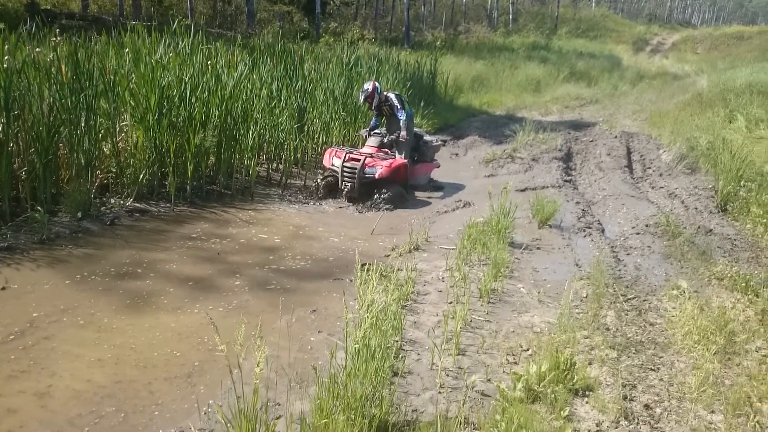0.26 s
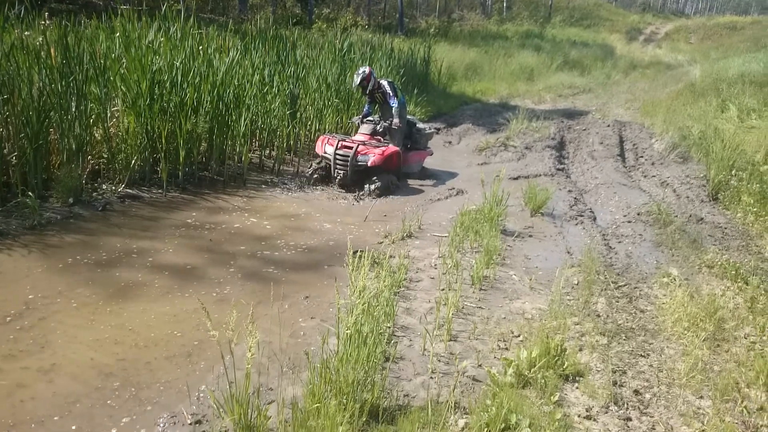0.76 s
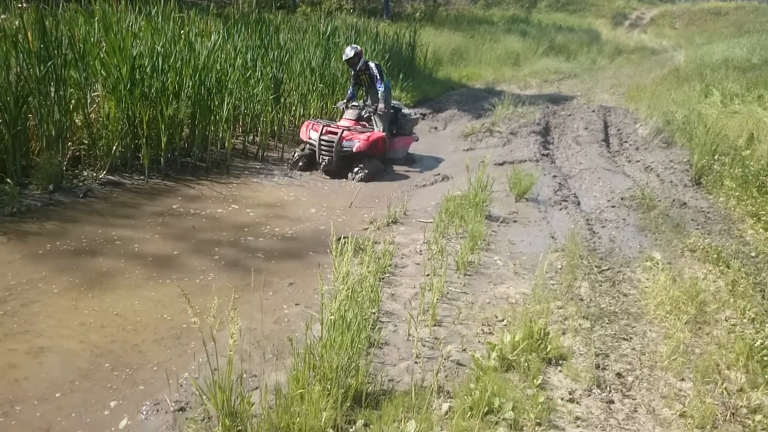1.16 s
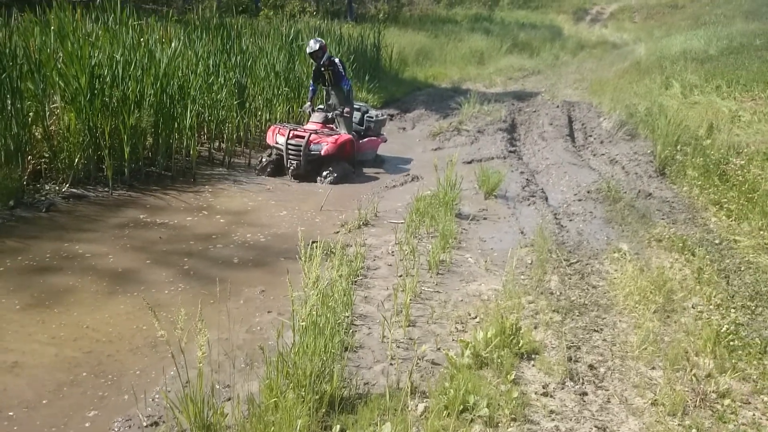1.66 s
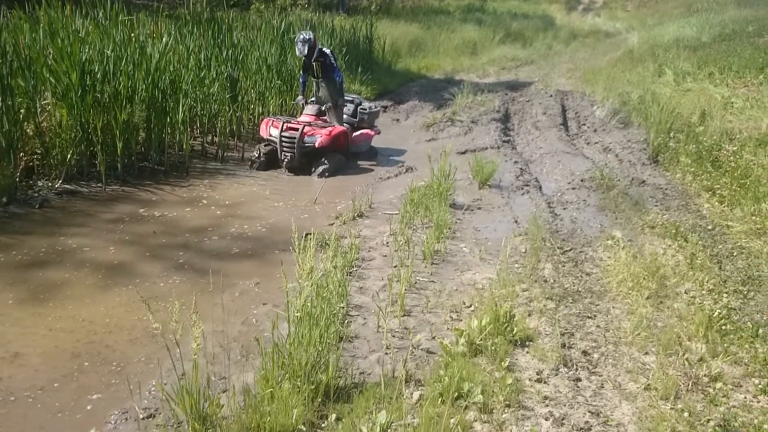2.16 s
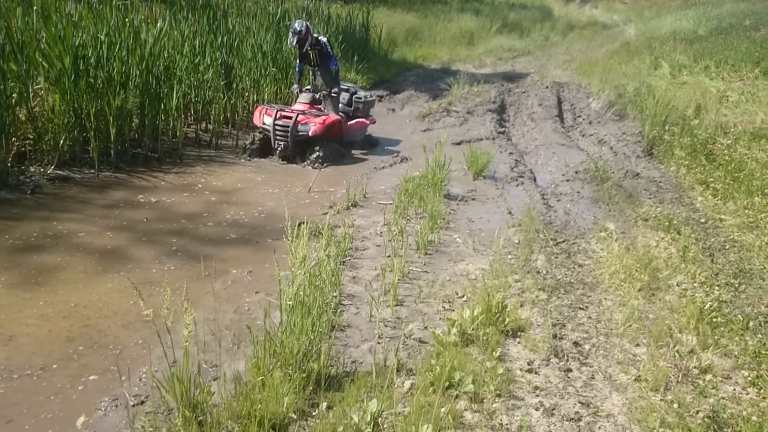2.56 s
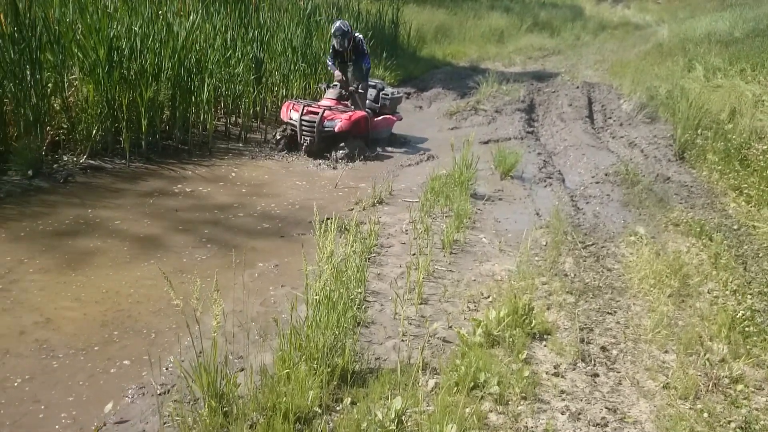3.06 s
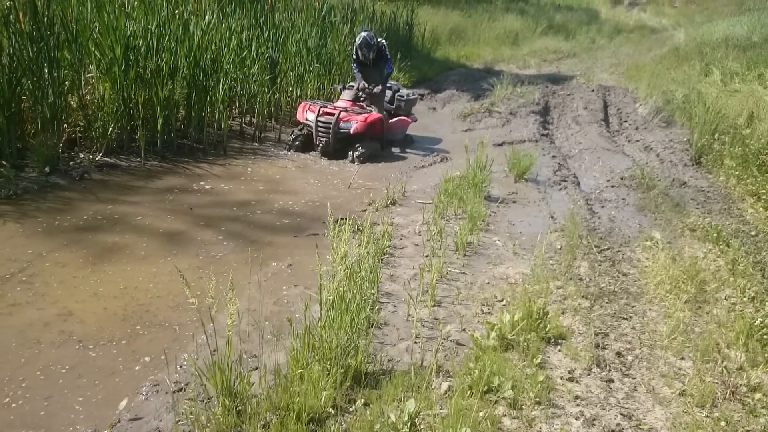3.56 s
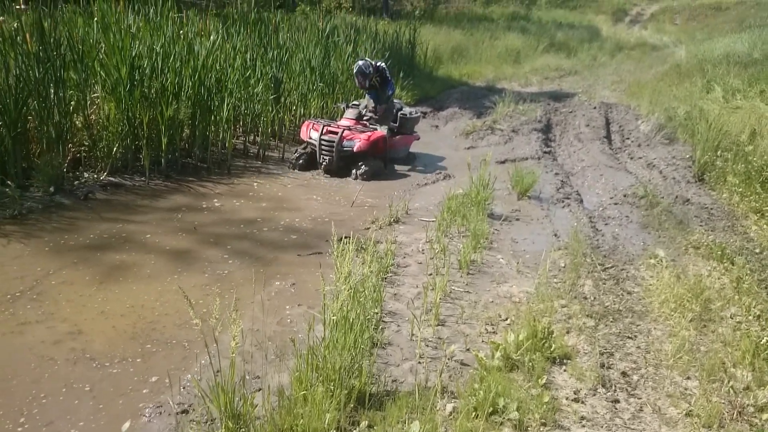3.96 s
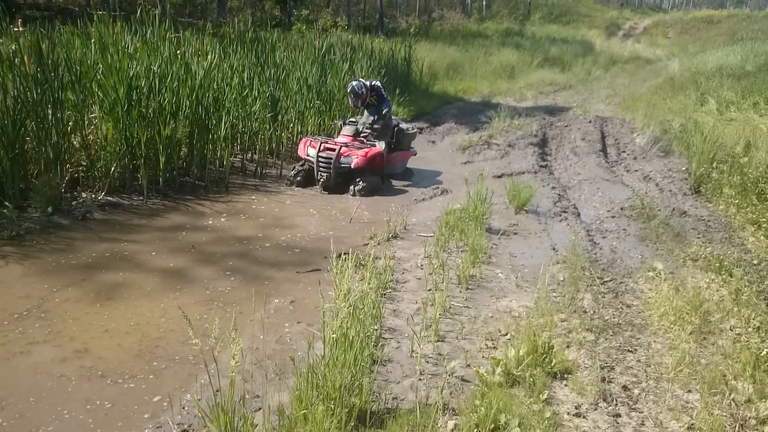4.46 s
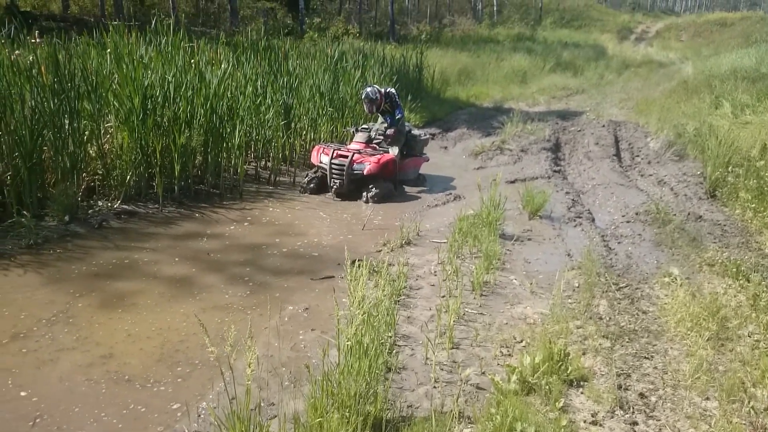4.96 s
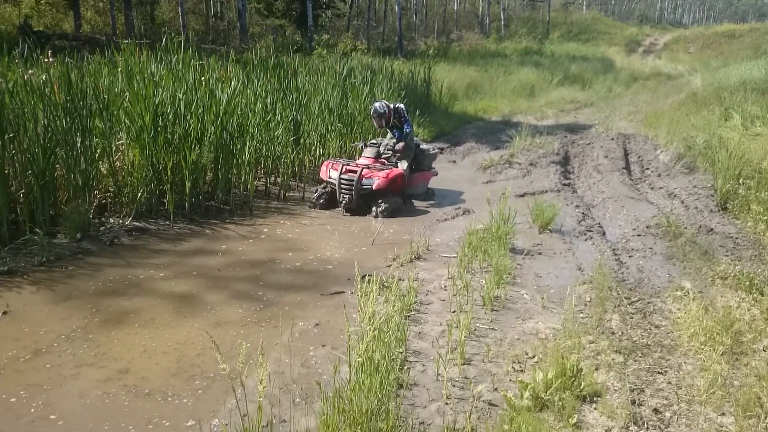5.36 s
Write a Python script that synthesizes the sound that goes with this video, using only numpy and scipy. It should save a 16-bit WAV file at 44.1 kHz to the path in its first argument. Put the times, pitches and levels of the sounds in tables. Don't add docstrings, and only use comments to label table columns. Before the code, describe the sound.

Starts mid-rev: raspy exhaust thuds and dense hissing wheelspin, then mud plops as the engine slackens. It labours back up, bursts at full throttle around two and a half seconds, spatters and drops to slow soft thumps. Nearby, a low twin engine putters evenly; open marsh air, faint ripples, stereo pair slightly stronger on the right.

```python
import sys
import numpy as np
from scipy import signal
from scipy.fft import rfft, irfft, next_fast_len
from scipy.io import wavfile
from scipy.ndimage import uniform_filter1d

SR = 44100
rng = np.random.default_rng(int(sys.argv[2]) if len(sys.argv) > 2 else 0)


def transcribe(u):
    v = np.clip(np.atleast_2d(u).T, -1, 1)
    q = np.round(v * 32767).astype(np.int16)
    wavfile.write(sys.argv[1], SR, q)


def undo_db(level):
    steps = np.asarray(level, float) / 20
    return 10 ** steps


N = 246959
TIME = np.arange(N) / SR

# (time [s], speed [firings/s])
SPEED = [(0.0, 22.06), (0.38, 24.49), (0.71, 15.96), (0.96, 14.01), (1.16, 16.86), (1.49, 17.56),
         (1.71, 19.28), (2.13, 19.08), (2.52, 23.37), (2.62, 28.15), (2.75, 25.82), (2.88, 14.98),
         (3.1, 11.29), (3.45, 9.93), (3.53, 10.32), (4.44, 10.79), (5.42, 10.88), (5.6, 12.89)]
# (time [s], opening [0 shut - 1 wide])
THROTTLE = [(0, .35), (.4, .38), (.55, .15), (1, .1), (1.3, .18), (2.13, .16), (2.25, .4), (2.45, .65),
            (2.6, 1), (2.7, .9), (2.8, .2), (3.1, 0), (5.6, 0)]
# (time [s], level of the gas puffs [dB])
CHARGE = [(0, -32.5), (.3, -31.5), (.6, -38), (.9, -43), (1.3, -38.5), (1.6, -35.5), (2, -34.5),
          (2.15, -36.5), (2.25, -28.5), (2.6, -26), (2.78, -35), (2.9, -46.5), (3.2, -48), (3.6, -47),
          (4.2, -49.5), (4.55, -44.5), (5.6, -46)]
# (frequency [Hz], level when shut [dB], gain wide open [dB], t60 [s])
PIPE = [
    (106, 0, 0, .14),
    (130, -22, 22, .12),
    (46, -9.5, 4, .13),
]
# (frequency [Hz], density [dB/Hz])
BARK = [(240, -35), (400, -3.5), (633, -2.5), (809, -5.5), (929, -5.5), (1020, -8), (1120, -3.5),
        (1640, -7), (1970, -0.5), (2550, -3), (2890, -6.5), (5410, 0), (8560, -20), (15600, -27.5)]
# (frequency [Hz], density [dB/Hz])
IDLE_BARK = [(290, -37), (500, -8), (620, -8), (804, -15.5), (1140, -13), (1470, -19.5), (2330, -8),
             (3110, -16.5), (5370, -12.5), (7580, -33.5), (15600, -47)]
# (frequency [Hz], density [dB/Hz])
JET = [(4000, -40), (7500, 3), (11000, -13.5), (15600, -10)]
# (delay after firing [turns], frequency [Hz], level [dB], t60 [s])
TAPPETS = [
    (-.17, 6100, -48, .02),
    (.1, 2350, -50, .06),
    (.3, 5350, -55, .05),
]

# (time [s], speed [cycles/s])
TWIN_SPEED = [(0.0, 9.679), (0.7, 9.216), (1.4, 9.347), (2.1, 9.347), (2.8, 9.446), (3.5, 9.33),
              (4.2, 9.305), (4.9, 9.482), (5.6, 9.368)]
# (place in the cycle [0-1], level [dB])
TWIN_FIRE = [
    (.103, -2),
    (.465, 0),
]
# (frequency [Hz], level [dB], t60 [s], phase lead [turns])
TWIN_PIPE = [
    (52, -23.3, .18, .07),
    (105.5, -23, .12, .47),
    (240, -28.5, .08, .2),
]

# (full spray at [s], held [s], spray [dB], churn [dB], dying [dB/s])
SPINS = [
    (-.13, 0.93, -31, -33.5, 51),
    (2.55, 0.6, -31.5, -38, 87),
]
# (time [s], level [dB])
SHOWERS = [
    (3.033, -30.5),
    (3.095, -39.5),
    (3.244, -41.5),
]
# (frequency [Hz], density [dB/Hz])
SPRAY = [(590, -29), (1000, -19.5), (1300, -14.5), (1680, -7), (2390, -5.5), (2750, -4), (4400, -6),
         (5350, 2), (6000, -3.5), (6810, -13.5), (7900, -13.5), (10500, -22.5), (15600, -21)]
# (frequency [Hz], density [dB/Hz])
CHURN = [(250, -29), (430, 0.5), (631, 6.5), (781, -4), (911, 2), (1490, 0), (2500, 1), (3250, -33),
         (5500, -120)]
# (time [s], peak level [dB], pitch [Hz], crack over ring [ratio])
DROPS = [(0.8868, -10, 1286, 0.094), (0.9153, -4.5, 2467, 0.067), (0.9566, -8, 5500, 0.1),
         (0.985, -28, 5500, .2), (3.029, -9, 5810, 0.17), (3.394, -29, 7400, 0.68), (3.5478, -40, 1280, .2),
         (3.594, -47, 11000, 1.5), (3.853, -40, 2160, .2), (5.5294, -38, 2224, .2), (5.5494, -48, 1050, .2)]

# (frequency [Hz], density [dB/Hz])
MARSH = [(240, -2.5), (400, -4), (543, -14), (716, -9.5), (822, -17), (1120, -14), (1540, -19),
         (2220, -13.5), (3360, -20), (5490, -15.5), (6910, -29), (10400, -40), (15600, -42.5)]
# (frequency [Hz], density [dB/Hz])
RUMBLE = [(15, -30), (30, 0), (80, -4), (180, -3), (280, -6), (350, -20), (600, -60)]
# (frequency [Hz], left minus right [dB])
TILT = [(35, -6), (60, -4.5), (110, -3.0), (200, -2.5), (380, -2.5), (700, -2.5), (1290, -5.5),
        (2380, -7.5), (4400, -8), (8120, 1.5), (15000, -1.5)]
# (frequency [Hz], left-right likeness [0-1])
ALIKE = [(300, 0.82), (600, .98), (1000, 1), (2500, 0.83), (5000, 0.068), (9000, 0.077)]

IDLE_CHARGE_DB, IDLE_THUMP_DB, THUMP_GROWS = -45.5, -26.5, 0.5
STEEP_FROM_DB, STEEP_PER_DB, STEEP_TOP = -45, .09, .62
OVERTONE_HZ, OVERTONE_DB, OVERTONE_T60_S = 212, -9, .085
SNAP_TURNS, SNAP_S, SNAP_DB, SNAP_GONE = 1.25, .00045, -7.5, .36
JET_DB, JET_STEADY = -18, 0.59
SPIN_RISE_DB_PER_S, SPIN_SAG_DB_PER_S, CHURN_LAG_S = 64, 5.5, 0.072
STIR_SPRAY_DB, STIR_CHURN_DB = -55, -55
SHOWER_S = 0.01
AIR_DB, RIPPLES_DB, RIPPLES_FADE_DB_PER_S = -49, -46.5, 2
SLOP_S, SLOP_LENGTH_S, SLOP_DB = 5.54, .06, -51.5


def unit(x):
    return x / np.sqrt(np.mean(x ** 2) + 1e-20)


def along(points, hz):
    f, value = np.transpose(points)
    return np.interp(np.log(hz + 1), np.log(f + 1), value)


def curve(rows, at=TIME):
    s, value = np.transpose(rows)
    return np.interp(at, s, value)


def filtered(x, response):
    m = next_fast_len(N + 8192)
    return irfft(rfft(x, m) * response(np.fft.rfftfreq(m, 1 / SR)), m)[..., :N]


def rush(spectrum, patchy_db):
    z = signal.stft(rng.standard_normal((2, N)), nperseg=256)[2]
    field = uniform_filter1d(rng.standard_normal(z.shape[1:]), size=2, axis=0)
    field = uniform_filter1d(field, size=8, axis=1)
    pair = signal.istft(z * undo_db(patchy_db * unit(field)), nperseg=256)[1][:, :N]

    def mid_side(hz):
        turn = np.arccos(np.clip(along(ALIKE, hz), -1, 1)) / 2
        return undo_db(along(spectrum, hz)) * [np.cos(turn), np.sin(turn)]

    mid, side = filtered(pair, mid_side)
    return unit(np.array([mid + side, mid - side]))


def firings(speed, start):
    cycles = start + np.cumsum(curve(speed)) / SR
    return np.interp(np.arange(0, cycles[-1]), np.r_[start - 1, cycles], np.r_[-1 / speed[0][1], TIME])


def place(times, pulses):
    index = np.round(times * SR).astype(int)[:, None] + np.arange(pulses.shape[1])
    return np.bincount(index.ravel() + SR, pulses.ravel(), N + 2 * SR)[SR:N + SR]


def engine_load():
    return np.clip(8 * curve(THROTTLE), 0, 1)


def pipe_wave(t, throttle, heat, charge_db):
    swell = (1 - np.exp(-t / (.002 + .02 * throttle ** 1.7))) ** (2 + 2 * throttle)
    wave = 0
    for hz, db, open_db, t60 in PIPE:
        level = undo_db(db + open_db * throttle - 60 * t * heat ** 3.8 / t60)
        wave = wave - level * np.sin(2 * np.pi * hz * heat * t)
    wave = wave * swell
    wave = wave / np.abs(wave).max(axis=1, keepdims=True)
    steep = np.clip(STEEP_PER_DB * (charge_db - STEEP_FROM_DB), 0, STEEP_TOP)
    wave = wave - steep * wave ** 2
    overtone = undo_db(OVERTONE_DB - 60 * t * heat / OVERTONE_T60_S) * np.cos(2 * np.pi * OVERTONE_HZ * heat * t)
    return wave + swell / swell[:, SR // 60, None] * overtone


def reflected_nick(t, throttle, heat):
    nick = np.exp(-((t - SNAP_TURNS / (PIPE[0][0] * heat)) / SNAP_S) ** 2 / 2)
    return np.clip(8 * throttle, 0, 1) * np.clip(2 - 2 * throttle / SNAP_GONE, 0, 1) * nick


def puff(s, rise, t60):
    return (s > 0) * (1 - np.exp(-np.abs(s) / rise)) * undo_db(-60 * np.abs(s) / t60)


def gas_noise(gate):
    load = engine_load()
    jet = undo_db(JET_DB) * np.clip(4 * curve(THROTTLE) - .8, 0, 1) * rush(JET, patchy_db=4.0)
    jet = jet * (gate + JET_STEADY * uniform_filter1d(gate, size=SR // 20))
    bark = load * rush(BARK, patchy_db=3)
    tick = 0.86 * (1 - load) * rush(IDLE_BARK, patchy_db=3.5)
    return jet + gate * (bark + tick)


def single():
    fire = firings(SPEED, 1 / 2)
    charge_db = curve(CHARGE, fire)[:, None]
    throttle = curve(THROTTLE, fire)[:, None]
    chance = rng.standard_normal((len(fire), 4))
    t = np.arange(SR // 8) / SR
    heat = (1 + .36 * throttle) * (1 + .015 * chance[:, :1])
    thump_db = IDLE_THUMP_DB + THUMP_GROWS * (charge_db - IDLE_CHARGE_DB) + 5
    wave = pipe_wave(t, throttle, heat, charge_db)
    thump = place(fire, undo_db(thump_db + 1.3 * chance[:, 1:2]) * wave)
    thump = filtered(thump, lambda hz: (1j * hz / (25 + 1j * hz)) ** 2 / (1 + (hz / 350) ** 4))
    nick = reflected_nick(t, throttle, heat)
    thump = thump - place(fire, undo_db(thump_db + SNAP_DB + 2 * chance[:, 2:3]) * nick)

    later = 0.1604 / curve(SPEED, fire)[:, None]
    first_puff = undo_db(np.minimum(40 * throttle - 4, 0)) * puff(t - .0035, .0005, .05)
    second_puff = undo_db(-2.5 + 1.5 * chance[:, 2:3]) * puff(t - .003 - later, .003, .1)
    gate = place(fire, undo_db(charge_db + 5.0 + 0.25 * chance[:, 3:]) * (first_puff + second_puff))
    return thump + gas_noise(gate)


def twin():
    t = np.arange(SR // 6) / SR
    ring = 0
    for hz, level, t60, lead in TWIN_PIPE:
        ring = ring + undo_db(level - 60 * t / t60) * np.sin(2 * np.pi * (hz * t + lead))
    ring = ring * (1 - np.exp(-t / .0012)) ** 2
    out = 0
    for at, db in TWIN_FIRE:
        fire = firings(TWIN_SPEED, 1 - .037 - at)
        chance = rng.standard_normal((len(fire), 2))
        out = out + place(fire + .0004 * chance[:, 0], undo_db(db + .8 * chance[:, 1:]) * ring)
    return out


def spin_db(full, held, dying):
    rise = np.minimum(SPIN_RISE_DB_PER_S * (TIME - full), 0)
    sag = SPIN_SAG_DB_PER_S * np.clip(TIME - full, 0, held)
    return rise - sag - dying * np.maximum(TIME - full - held, 0)


def droplets():
    when, pitch, size = rng.random((3, 2200))
    t = np.arange(SR // 100) / SR
    hz = 700 * 9.5 ** pitch[:, None]
    strength = undo_db(-3.5 * np.log(size[:, None] + 0.00051))
    rings = np.sin(2 * np.pi * hz * t) * np.exp(-hz * t / 6) * strength
    return undo_db(-12) * unit(place(when * 3.6, rings))


def splash():
    stir = engine_load()
    spray = stir * undo_db(STIR_SPRAY_DB)
    churn = stir * undo_db(STIR_CHURN_DB)
    for s, held, spray_db, churn_db, dying in SPINS:
        spray = spray + undo_db(spray_db + spin_db(s, held, dying))
        churn = churn + undo_db(churn_db + spin_db(s + CHURN_LAG_S, held - CHURN_LAG_S, dying))
    for s, db in SHOWERS:
        spray = spray + undo_db(db) * np.exp(-((TIME - s) / SHOWER_S) ** 2)
    return churn * rush(CHURN, patchy_db=2.5) + spray * (rush(SPRAY, patchy_db=3.0) + droplets())


def marsh_air():
    ripples = undo_db(RIPPLES_DB - 5 - RIPPLES_FADE_DB_PER_S * TIME)
    slop = undo_db(SLOP_DB) * np.exp(-((TIME - SLOP_S) / SLOP_LENGTH_S) ** 2)
    return (undo_db(AIR_DB - 4) + ripples + slop) * rush(MARSH, patchy_db=1.5)


def rumble():
    return undo_db(-40) * rush(RUMBLE, patchy_db=0.5)


def tappets():
    fire = firings(SPEED, 1 / 2)[1:]
    t = np.arange(SR // 16) / SR
    out = 0
    for turns, hz, db, t60 in TAPPETS:
        chance = rng.standard_normal((len(fire), 3))
        ring = np.sin(2 * np.pi * hz * (1 + 0.044 * chance[:, :1]) * t) * (1 - np.exp(-t / .002))
        moment = fire + (turns + .03 * chance[:, 1]) / curve(SPEED, fire)
        out = out + place(moment, undo_db(db + 2.5 * chance[:, 2:] - 60 * t / t60) * ring)
    return out


def drops():
    s, db, hz, crack = np.transpose(DROPS)
    t = np.arange(SR // 30) / SR
    ring = np.sin(2 * np.pi * hz[:, None] * t * (1 + 8 * t))
    ring = ring + crack[:, None] * rng.standard_normal((len(s), len(t)))
    ring = ring + 0.6 * np.sin(2 * np.pi * 5600 * t)
    return place(s, undo_db(db[:, None] - 60 * t / 0.0078) * ring * (1 - np.exp(-t / 0.0012)))


def scene():
    engines = single() + twin()
    surroundings = marsh_air() + rumble()
    return engines + splash() + surroundings + tappets() * undo_db([[-6], [1]]) + drops()


def roll_off(x):
    return signal.sosfilt(signal.butter(12, 15710, fs=SR, output="sos"), x)


def record(dry):
    side = np.array([[1], [-1]]) / 2

    def microphones(hz):
        tilt = undo_db(side * along(TILT, hz))
        lead = np.exp(2j * np.pi * side * (hz * .000095 + 7 / (hz + 15)))
        return (hz < SR * .357) * tilt * lead

    return roll_off(filtered(dry, microphones))


dry = scene()
out = record(dry)
transcribe(out)
```